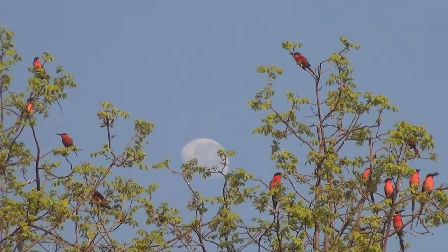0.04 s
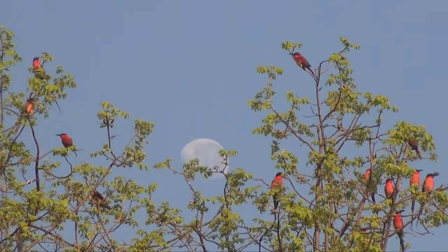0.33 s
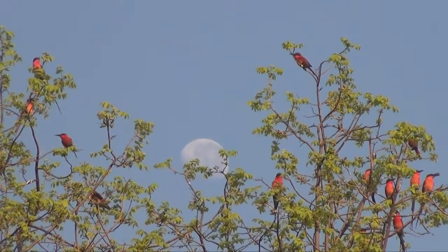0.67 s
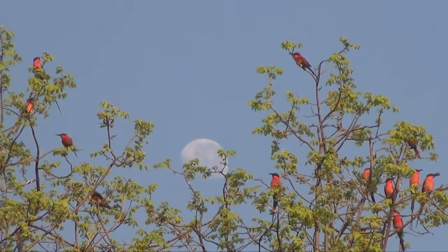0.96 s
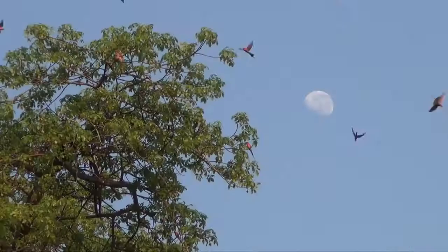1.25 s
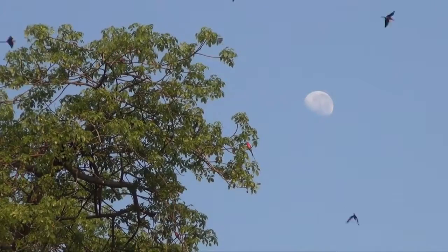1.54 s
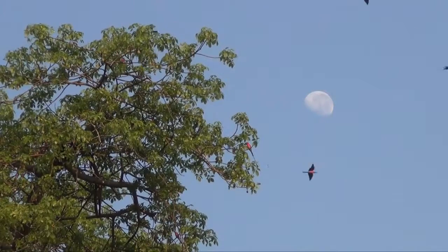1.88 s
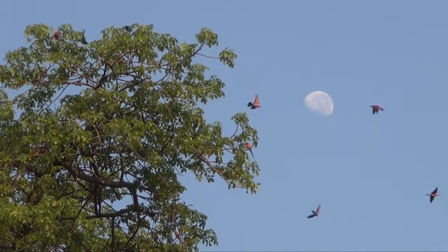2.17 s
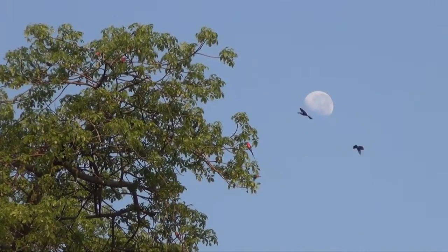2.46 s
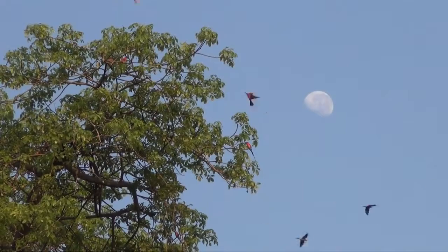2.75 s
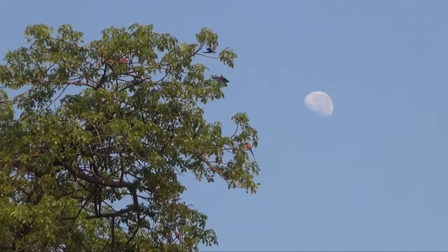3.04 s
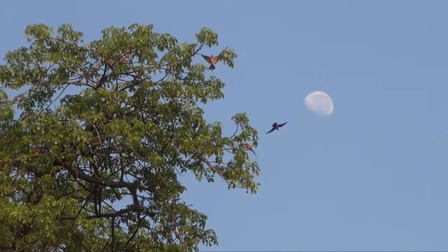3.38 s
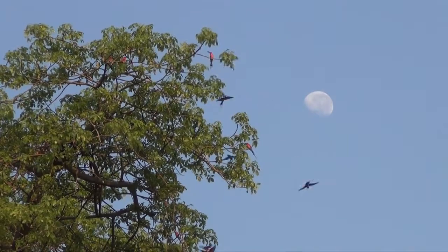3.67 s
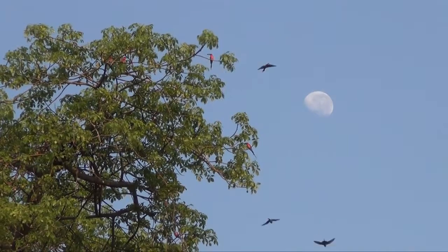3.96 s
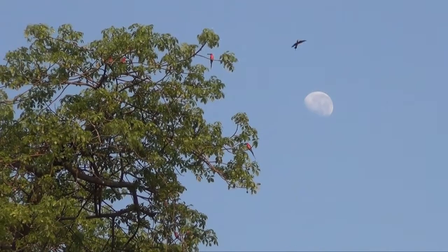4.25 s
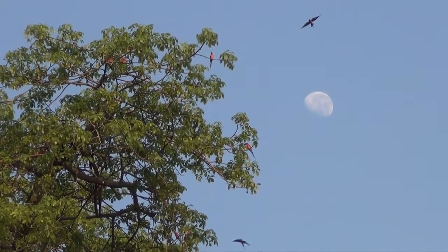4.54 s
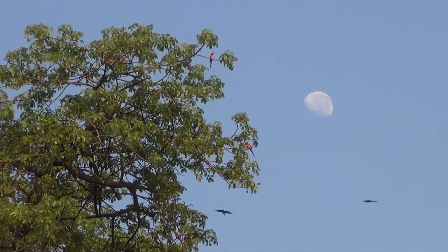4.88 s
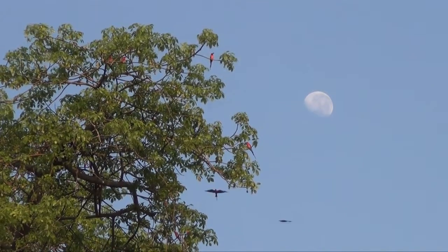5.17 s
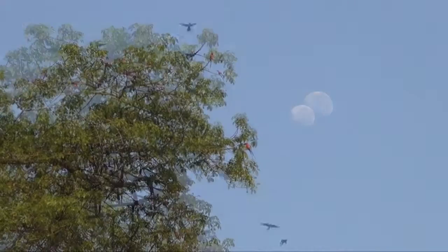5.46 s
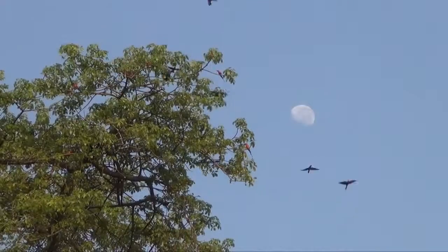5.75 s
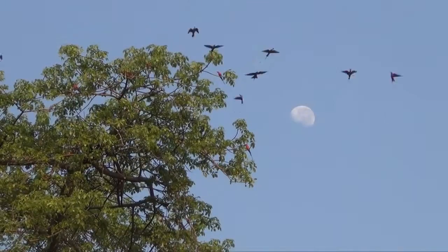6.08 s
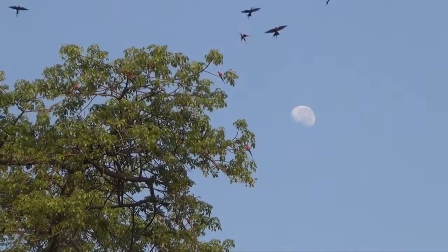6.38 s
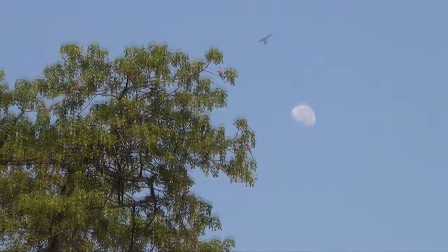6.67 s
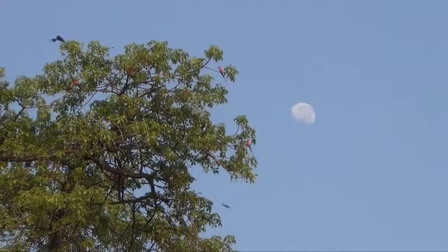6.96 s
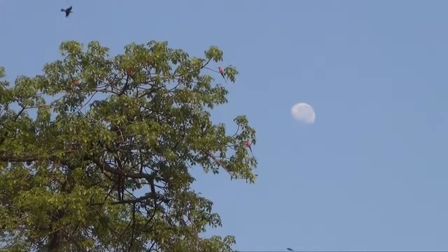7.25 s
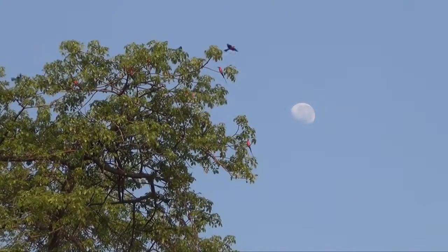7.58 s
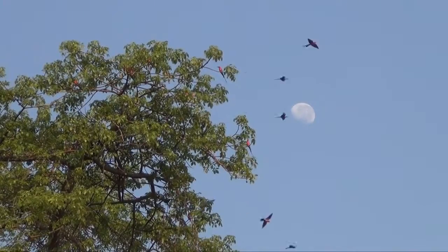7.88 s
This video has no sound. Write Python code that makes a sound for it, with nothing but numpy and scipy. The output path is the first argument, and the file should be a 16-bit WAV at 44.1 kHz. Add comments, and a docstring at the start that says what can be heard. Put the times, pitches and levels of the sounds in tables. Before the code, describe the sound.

A colony of bee-eaters chatters in a tree with short, rough, drooping calls. At first they are close and crowded, slightly to the right; after about a second, fewer birds call from further off, straight ahead. A faint buzzy scold, a small bird's thin whistles and two dry ticks come in between. Behind them lie a faint outdoor murmur and hiss, with soft wind rumbling on the microphone.

```python
"""Bee-eaters chatter in a tree: short, rough, drooping notes from the syrinx, strongest on their second
harmonic and mostly opened by a rasp. At first the colony is close and crowded, a little right of the
microphone; then fewer birds call from further off, straight ahead. Leaves scatter the calls, along with
a small bird's thin whistles, one buzzy scold and two dry ticks. Behind them lie a faint outdoor murmur,
hiss and hum, and soft wind rumbles on the microphone."""
import sys
import numpy as np
from scipy import signal
from scipy.fft import rfft, irfft
from scipy.io import wavfile
from scipy.ndimage import map_coordinates

SR = 44100
rng = np.random.default_rng(int(sys.argv[2]) if len(sys.argv) > 2 else 0)


def persist_wave(psi):
    """Save psi, clipped to +-1, as 16-bit WAV."""
    counts = np.round(np.clip(psi, -1, 1) * 32767).astype(np.int16)
    wavfile.write(sys.argv[1], SR, np.atleast_2d(counts).T)


N = 353682
TIME = np.arange(N) / SR


def undb(db):
    """Decibels to gain."""
    return 10 ** (np.asarray(db) / 20)


def unit(x):
    """Scale to rms 1."""
    return x / np.sqrt(np.mean(x ** 2) + 1e-20)


def curve(rows):
    """Join (time, value) rows by straight lines."""
    return np.interp(TIME, *np.transpose(rows))


def band_noise(samples, lo_hz, hi_hz, order=2):
    """Band-passed noise at rms 1."""
    sos = signal.butter(order, [lo_hz, hi_hz], "band", fs=SR, output="sos")
    return unit(signal.sosfilt(sos, rng.standard_normal(samples)))


def wander(t, rate):
    """Smooth random motion through `rate` points a second, with a spread near 1."""
    points = rng.standard_normal(256)
    return map_coordinates(points, [t * rate + rng.random()], order=3, mode="wrap")


def gate(t, attack_s, release_s):
    """Smooth opening and closing of a note."""
    ramps = np.clip(t / attack_s, 0, 1) * np.clip((t[-1] - t) / release_s, 0, 1)
    return np.sin(np.pi / 2 * ramps) ** 2


def add(out, start, sound):
    """Mix a sound in at its start time."""
    i = int(np.clip(start * SR, 0, N - 1))
    out[i:i + len(sound)] += sound[:N - i]


def stereo(mid, side):
    """Mid and side to left and right."""
    return np.array([mid + side, mid - side])


# spectrum of the open air around the tree: (frequency [Hz], relative level [dB])
AIR_SPECTRUM = [(40, -39), (90, -2.5), (160, 1), (350, -1.5), (520, -2), (590, 5.5), (670, -1), (860, 5),
                (1000, 1), (1200, 2), (1700, -3.5), (3500, -8), (8000, -12.5), (11500, -15)]

def air(level_db=-56, wide_below_hz=620):
    """Distant murmur and even hiss, wider in the bass and a little louder at first."""
    hz = np.maximum(np.fft.rfftfreq(N, 1 / SR), 1)
    points_hz, points_db = np.transpose(AIR_SPECTRUM)
    colour = undb(np.interp(np.log(hz), np.log(points_hz), points_db))
    width = .0043 + .34 / (1 + (hz / wide_below_hz) ** 2)
    mid, side = (irfft(rfft(rng.standard_normal(N)) * colour * gain, N) for gain in (1, width))
    lift_db = curve([(0, 3), (1.26, 2.5), (1.29, 1.1), (4, 0)])
    return stereo(mid, side) / np.std(mid) * undb(level_db + lift_db)


# faint tones in the background, dead centre: (frequency [Hz], level [dB])
HUM_TONES = [(60, -78), (4990, -90), (7854, -85)]

def hum():
    """A steady low hum and a thin whine."""
    return sum(np.sqrt(2) * undb(db) * np.sin(2 * np.pi * hz * TIME) for hz, db in HUM_TONES)


# gusts right at the microphone: (peak time [s], half-width [s], level [dB])
MIC_GUSTS = [(3.3, 0.13, -67), (3.82, 0.042, -56), (4.05, 0.19, -61.5), (4.27, .06, -57.5),
             (4.58, 0.3, -67.5), (5.07, 0.056, -62.5), (5.63, 0.29, -63.5), (6.3, .05, -60),
             (6.42, .05, -56), (6.77, .025, -63.5)]

def wind(calm_db=-76, side_db=-10):
    """Soft gusts swell and die away, rumbling on the microphone."""
    mid, side = (band_noise(N, 37, 92) for _ in range(2))
    gusts = (undb(db) * np.exp(-((TIME - peak) / width) ** 2) for peak, width, db in MIC_GUSTS)
    power = undb(calm_db) ** 2 + sum(gust ** 2 for gust in gusts)
    return stereo(mid, undb(side_db) * side) * np.sqrt(power)


def foliage(sound, leaves_t60=.092, leaves_db=-13, trees_t60=.11, trees_db=-19, side_db=-6):
    """Leaves and ground return a short diffuse tail, the trees around a fainter, slightly longer one."""
    t = np.arange(SR) / SR
    decays = (np.exp(-np.log(1000) * t / t60) * (t > .003) for t60 in (leaves_t60, trees_t60))
    leaves, trees = (decay / np.linalg.norm(decay) for decay in decays)
    tail = np.hypot(undb(leaves_db) * leaves, undb(trees_db) * trees)
    mid, side = (signal.fftconvolve(sound, rng.standard_normal(SR) * tail)[:N] for _ in range(2))
    return stereo(mid, undb(side_db) * side)


# light ticks among the leaves: (time [s], level [dB])
DRY_TICKS = [(3.06, -47.5), (6.779, -59)]

def ticks(decay_s=.0031):
    """Brief dry ticks, as of a twig."""
    out = np.zeros(N)
    t = np.arange(SR // 50) / SR
    for start, db in DRY_TICKS:
        add(out, start, undb(db) * band_noise(len(t), 900, 7000, order=1) * np.exp(-t / decay_s))
    return out


# a small bird, faint behind the colony:
# (time [s], length [s], first pitch [Hz], middle pitch [Hz], last pitch [Hz], level [dB])
SONGBIRD_WHISTLES = [(4.012, .032, 4880, 5300, 4840, -71), (4.13, .028, 5000, 4950, 4900, -65),
                     (4.215, 0.024, 5470, 5150, 4800, -68), (4.3, .026, 5100, 5100, 4950, -70),
                     (4.454, .018, 5900, 5500, 4900, -65), (5.327, 0.037, 3250, 3870, 3700, -58.5),
                     (5.35, 0.049, 3840, 3420, 3050, -62)]

def whistles(run_start=4.546, period_s=.0615, sweep_s=.027, sweep_hz=(6270, 4870, 3770), sweep_db=-70.5):
    """Thin pure glides of a small songbird: single whistles and an even run of six falling sweeps."""
    out = np.zeros(N)
    sweeps = [(run_start + k * period_s, sweep_s, *sweep_hz, sweep_db) for k in range(6)]
    for start, length, *pitches, db in list(SONGBIRD_WHISTLES) + sweeps:
        t = np.arange(int(length * SR)) / SR
        hz = np.polyval(np.polyfit([0, .5, 1], pitches, 2), t / t[-1])
        glide = np.sin(2 * np.pi * np.cumsum(hz) / SR)
        add(out, start, undb(db) * unit(glide * gate(t, .0082, .0062)))
    return out


def churr(start=2.225, length_s=.21, db=-59, pulse_hz=75):
    """Another bird gives one high, buzzy scold."""
    out = np.zeros(N)
    t = np.arange(int(length_s * SR)) / SR
    buzz = band_noise(len(t), 3050, 4000, order=5) * (1 + .19 * np.sin(2 * np.pi * pulse_hz * t))
    add(out, start, undb(db) * buzz * gate(t, .15, .027))
    return out


# upper harmonics of a bee-eater's voice: (multiple of the pitch, relative level [dB])
VOICE_OVERTONES = [(3, 4.5), (4, -2), (5, 3), (6, -4), (7, -23)]

def note(length, early_hz, late_hz, fundamental_db, overtones_db, rough,
         trill_hz=70, trill=.067, jitter=.0602, droop=.262, detune=.13):
    """One bee-eater note: the syrinx trills and falters; pitch and level sag as the pressure runs out."""
    t = np.arange(int((length + .00519) * SR)) / SR
    progress = t / t[-1]
    trill_phase = 2 * np.pi * (trill_hz * t + .089 + .21 * wander(t, 70.5))
    glide_hz = early_hz + (late_hz - early_hz) * (2 * progress - .5)
    sag = droop * min(.37 + 2.6 * rough, 1) * progress ** 6  # clean notes hold their pitch better
    waver = trill * np.cos(trill_phase) + jitter * wander(t, 330)
    hz = glide_hz * (1.022 - sag) * (1 + rough * waver)
    phase = 2 * np.pi * np.cumsum(hz) / SR
    # each throb of the trill is loudest while its pitch falls
    throb = np.tanh((rough + .089) * (.34 * wander(t, 210) + .22 * np.sin(trill_phase)))
    pressure = np.exp(throb - .09 * (1 - progress) ** 4 - .78 * progress ** 3) * gate(t, .0065, .006)
    # the throat favours the second harmonic and shuts out what lies above it
    second = unit(np.sin(2 * phase) / np.sqrt(1 + (hz / 1580) ** 20))
    # the other side of the syrinx joins in fits, a little flat, and beats against the first
    beat = .79 * wander(t, 240) * np.sin(2 * (1 - detune) * phase)
    # uneven cycles fill the gap under the second harmonic and blur the overtones
    hoarse = .24 * band_noise(len(t), 1530, 2400, order=3)
    blurred_phase = phase + (rough + .093) * .52 * wander(t, 803)
    overtones = sum(undb(db + 3.3 * wander(t, 160)) * np.sin(k * blurred_phase)
                    for k, db in VOICE_OVERTONES)
    fundamental = undb(fundamental_db + 2) * np.sin(phase)
    fundamental *= np.exp(.26 * wander(t, 167) - .35 * progress ** 4)
    tone = second + rough * (beat + hoarse) + fundamental + undb(overtones_db) * overtones
    return unit(pressure * tone)


# the colony's chatter from deep in the tree: (time [s], level [dB])
FAR_CHATTER = [(0, -43.5), (.3, -43), (.7, -47.5), (1.26, -46), (1.29, -61), (2.3, -56), (3.1, -62),
               (3.9, -67.5), (4.3, -61), (5.2, -62.5), (5.6, -72.5), (6.0, -66), (6.5, -58.5), (7.1, -66.5),
               (8.02, -58)]

def far_birds(count=340, pitch_hz=1325):
    """Many distant bee-eater notes overlap into one chatter."""
    out = np.zeros(N)
    for i, (when, size, pitch, strength) in enumerate(rng.random((count, 4))):
        hz = pitch_hz * (1 + .32 * (pitch - .5))
        call = note(.0245 + .0405 * size, hz, .95 * hz, fundamental_db=-5, overtones_db=-25, rough=.696)
        add(out, (i + when) / count * N / SR, undb(4 * strength) * call)
    return unit(out) * undb(curve(FAR_CHATTER))


def branch_echo(sound, echo_db=-11, shortest_s=.001996, spread_s=.007):
    """A short detour by way of a branch; on a glide it beats against the direct sound."""
    lag = int((shortest_s + spread_s * rng.random()) * SR)
    return np.pad(sound, (0, lag)) + undb(echo_db) * np.pad(sound, (lag, 0))


def add_rasp(out, note_start, length, db, overlap_s=.007):
    """The syrinx rattles irregularly in the throat before the voice locks into its note."""
    t = np.arange(int(length * SR)) / SR
    rattle = band_noise(len(t), 1250, 3000, order=5)
    throat = undb(-2) * band_noise(len(t), 1500, 1900)
    rasp = unit((rattle + throat) * gate(t, .012, .0043))
    add(out, note_start + overlap_s - length, undb(db) * rasp)


def voice(length, hz, rough, overtones_db, fall):
    """A sinking note and its branch echo; higher and rougher notes let more fundamental through."""
    fundamental_db = -8 + .01 * (hz - 1340) + 6.5 * (rough - .54)
    early_hz, late_hz = hz * (1 + fall / 2), hz * (1 - fall / 2)
    return branch_echo(note(length, early_hz, late_hz, fundamental_db, overtones_db, min(rough, 1)))


# low piping from the nearer perches: (time [s], length [s], nominal pitch [Hz], level [dB])
NEAR_PIPINGS = [(6.195, 0.023, 1106, -44), (6.225, .022, 1150, -55), (6.371, 0.043, 1211, -45),
                (6.438, .041, 1172, -45.5)]

def pipings(fall=.012):
    """Soft clear notes without a rasp, almost level and nearly all second harmonic."""
    out = np.zeros(N)
    for start, length, hz, db in NEAR_PIPINGS:
        early_hz, late_hz = hz * (1 + fall / 2), hz * (1 - fall / 2)
        pipe = note(length, early_hz, late_hz, fundamental_db=-24, overtones_db=-44, rough=.098)
        add(out, start, undb(db) * branch_echo(pipe))
    return out


# stuttered calls from the nearer perches:
# (time [s], syllables, spacing [s], nominal pitch [Hz], level [dB], roughness)
NEAR_STUTTERS = [(1.595, 2, 0.02, 1250, -45.5, 0.53), (1.696, 2, 0.021, 1286, -47, 0.51),
                 (2.251, 3, .025, 1344, -46, .68), (2.465, 3, 0.025, 1234, -45.5, 0.52),
                 (2.627, 3, 0.023, 1280, -46, 0.54), (3.329, 2, 0.019, 1180, -50.5, 0.48),
                 (3.469, 2, 0.018, 1160, -51.5, 0.54), (4.147, 4, .024, 1254, -50, 0.36),
                 (4.295, 2, 0.02, 1253, -51, 0.54), (4.765, 3, 0.024, 1298, -54, 0.43),
                 (6.56, 3, 0.025, 1180, -52, .5), (7.41, 2, 0.018, 1467, -50.5, 0.14)]

def stutters(pitch_step=.03):
    """A short rasp, then quick syllables that step down in pitch, the last drawn out."""
    out = np.zeros(N)
    for start, syllables, spacing, hz, db, rough in NEAR_STUTTERS:
        add_rasp(out, start, length=.029, db=db - 11)
        last = syllables - 1
        for k in range(syllables):
            length = spacing * (1.52 if k == last else .913)
            pitch = hz * (1 - pitch_step * (k - last / 2))
            syllable = voice(length, pitch, rough, overtones_db=-36, fall=.0655)
            add(out, start + k * spacing, undb(db) * syllable)
    return out


# single calls from the nearer perches:
# (time [s], length [s], nominal pitch [Hz], level [dB], roughness, overtone gain [dB])
NEAR_SQUAWKS = [(0.003, 0.013, 1202, -43.5, 1.06, -20), (0.09, 0.034, 1280, -41.5, 0.94, -36),
                (0.138, .06, 1306, -40, .72, -40), (0.264, 0.05, 1340, -35, .6, -30.5),
                (0.296, 0.046, 1265, -40.5, 0.73, -31), (0.344, 0.033, 1363, -39.5, .7, -30),
                (0.377, 0.041, 1230, -43, .4, -35), (0.456, 0.036, 1342, -41.5, 0.46, -34),
                (0.482, .018, 1524, -48, 0.56, -26), (0.5, 0.034, 1438, -41, 0.09, -27),
                (0.578, 0.04, 1360, -47.5, 1.1, -24), (0.621, 0.049, 1390, -47, 0.94, -32),
                (0.686, 0.027, 1340, -42, 0.33, -43), (0.759, 0.031, 1330, -37.5, 0.74, -26),
                (0.776, 0.069, 1354, -37, 0.42, -26.5), (0.852, 0.029, 1395, -43, 0.77, -29),
                (0.886, .056, 1380, -43.5, 0.58, -30), (0.951, 0.027, 1415, -46.5, 0.44, -37),
                (0.985, .055, 1260, -44, 0.68, -32), (1.044, 0.048, 1345, -47.5, 0.68, -32),
                (1.129, 0.034, 1364, -40, 0.36, -30), (1.157, 0.056, 1350, -36.5, 0.43, -26.5),
                (1.226, 0.047, 1373, -40.5, .73, -31), (1.298, 0.029, 1400, -48.5, .44, -30),
                (1.318, 0.043, 1356, -41.5, 0.6, -24.5), (1.364, 0.057, 1275, -42.3, 0.5, -31),
                (1.456, 0.021, 1340, -42.5, 0.26, -33), (1.477, .038, 1299, -41.5, 0.34, -28),
                (1.787, 0.053, 1290, -40.5, 0.57, -25), (1.841, 0.036, 1385, -54, 0.17, -28),
                (1.926, 0.051, 1373, -48.5, 0.48, -37), (1.992, .05, 1336, -45, 0.45, -40.5),
                (2.081, .02, 1258, -44, 0.33, -29), (2.101, 0.041, 1280, -41, 0.7, -29),
                (2.343, 0.04, 1404, -48, 0.4, -26), (2.727, 0.013, 1400, -52.5, .3, -28),
                (2.747, 0.031, 1432, -49.5, .6, -30), (2.773, 0.046, 1300, -44.5, 0.62, -34),
                (2.848, 0.053, 1380, -45, 0.54, -27), (2.892, 0.039, 1225, -45.5, .5, -28),
                (2.933, 0.054, 1290, -48, 0.58, -27), (3.102, .035, 1443, -62, 0.44, -26),
                (3.178, 0.062, 1265, -43.5, 0.55, -35), (3.231, 0.06, 1335, -45, 0.57, -31),
                (3.4, 0.04, 1208, -48, .5, -45), (3.425, .046, 1302, -47.5, 0.86, -44),
                (3.689, .064, 1310, -44, 0.66, -27), (3.745, 0.047, 1267, -44, 0.6, -38),
                (3.953, 0.014, 1310, -56.5, 0, -42), (4.071, 0.071, 1342, -44.5, 0.83, -25),
                (4.375, .042, 1315, -45, 0.36, -31), (4.483, 0.051, 1295, -49.5, 0.8, -34),
                (4.595, 0.041, 1273, -49.5, 0.7, -26), (4.632, 0.046, 1314, -44.5, 0.28, -40),
                (4.96, 0.045, 1332, -44.5, 0.4, -38), (5.077, 0.04, 1245, -49, 0.22, -46),
                (5.238, 0.094, 1283, -55, .84, -34), (5.319, 0.042, 1336, -57.5, .5, -31),
                (5.412, .049, 1383, -54, 0.58, -30), (5.796, 0.035, 1345, -59, 0.6, -34),
                (5.854, 0.0214, 1158, -54, 0.4, -45), (5.947, 0.018, 1166, -53.5, .35, -44),
                (6.046, 0.043, 1338, -41.5, 0.37, -27), (6.13, .05, 1396, -42.5, .15, -20.5),
                (6.261, 0.035, 1174, -52.5, 0.64, -27), (6.807, 0.04, 1267, -45, 0.7, -33),
                (6.874, .04, 1330, -60.5, 0.6, -34), (6.974, 0.059, 1348, -49.5, .5, -27),
                (7.11, .047, 1350, -44.5, 0.49, -24), (7.273, 0.058, 1318, -47, 0.34, -28),
                (7.57, .052, 1332, -47, 0.35, -30), (7.654, 0.038, 1236, -56, 0.73, -34),
                (7.737, 0.056, 1376, -46.5, 0.43, -29)]

def squawks():
    """A rasp, then one rough note; a forced call has both stronger overtones and a louder rasp."""
    out = np.zeros(N)
    for start, length, hz, db, rough, overtones_db in NEAR_SQUAWKS:
        force_db = .29 * (overtones_db + 26)
        add_rasp(out, start, length=.04, db=db - 10.5 + force_db)
        add(out, start, undb(db) * voice(length, hz, rough, overtones_db, fall=.0434))
    return out


def scene():
    """Facing the tree: the close birds sit slightly right, the later ones almost straight ahead."""
    tree = squawks() + stutters() + pipings() + far_birds() + whistles() + churr() + ticks()
    left_over_right_db = np.where(TIME < 1.276, -1.5, .3)
    pan = undb(stereo(0, left_over_right_db / 2))
    return (tree + foliage(tree)) * pan + air() + hum() + wind()


def record(dry, top_hz=11900):
    """The microphone chain cuts the top steeply."""
    return signal.sosfilt(signal.ellip(10, .2, 80, top_hz, fs=SR, output="sos"), dry)


dry = scene()
out = record(dry)
persist_wave(out)
```